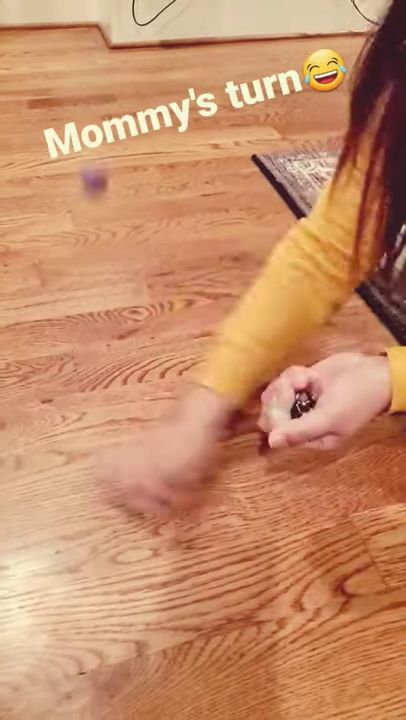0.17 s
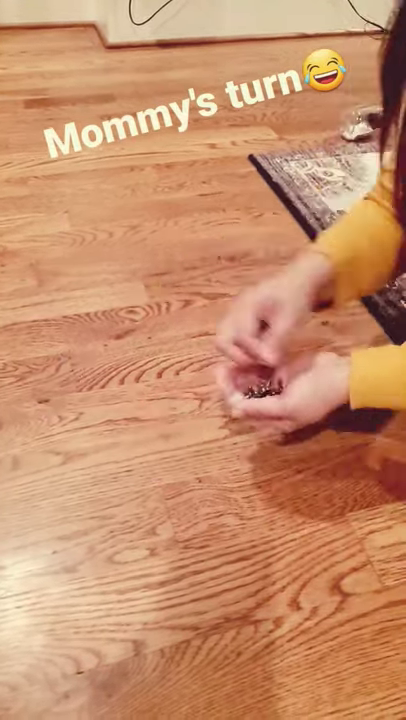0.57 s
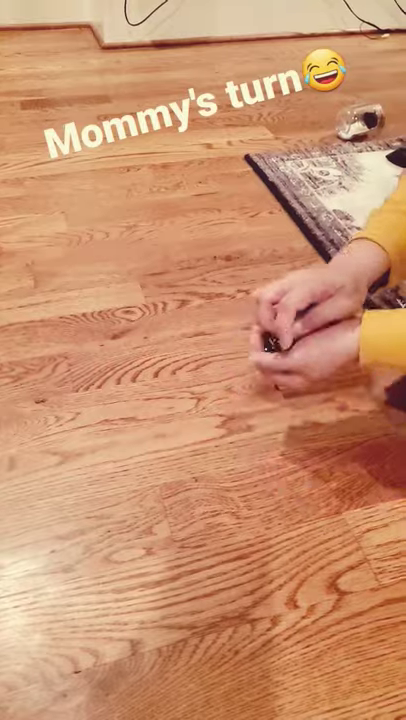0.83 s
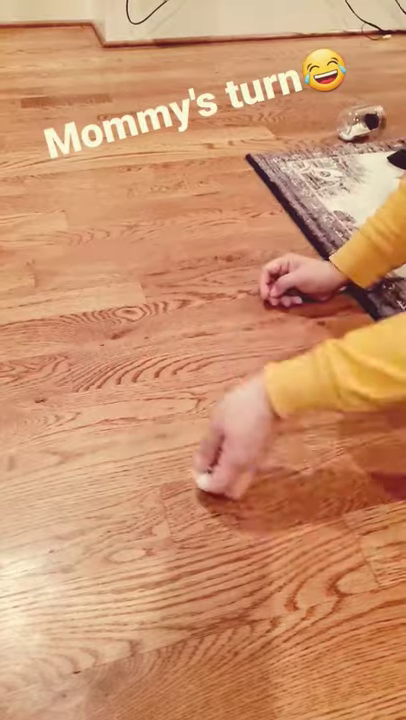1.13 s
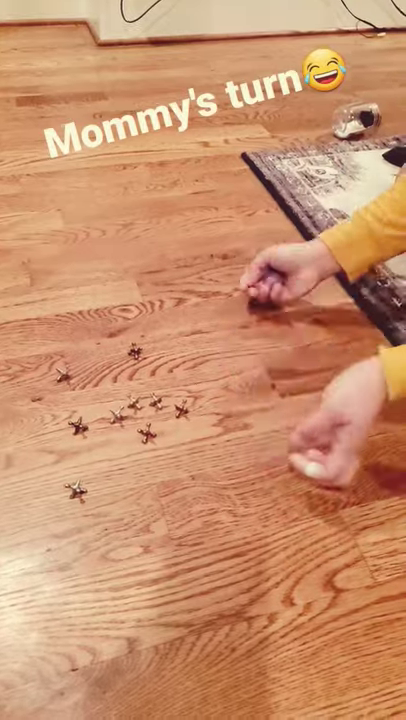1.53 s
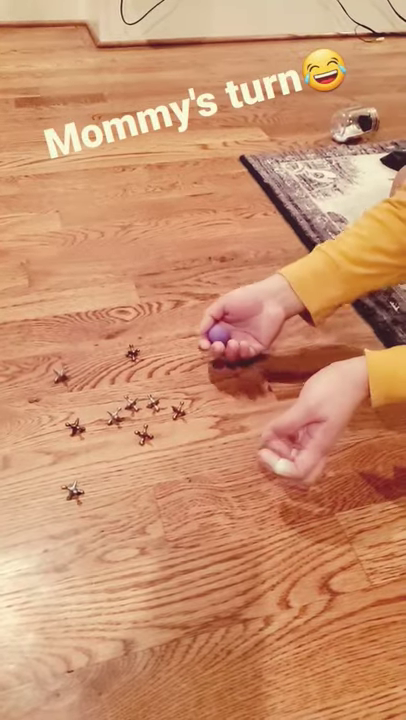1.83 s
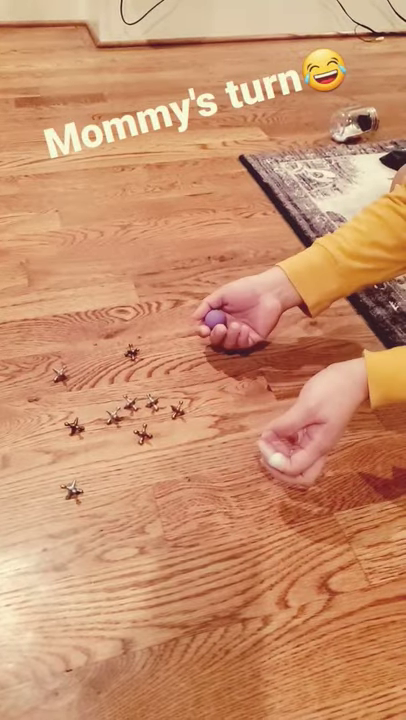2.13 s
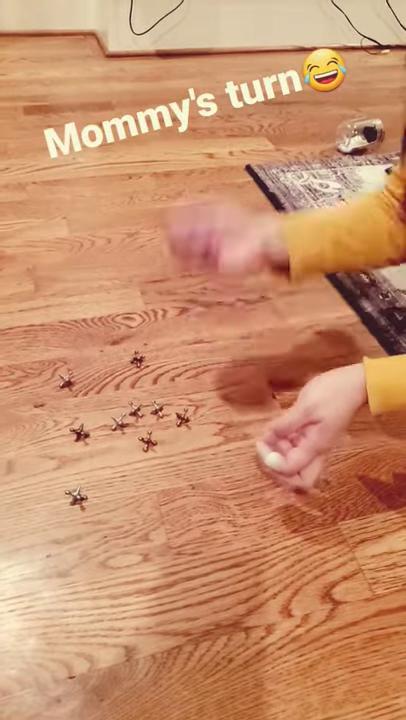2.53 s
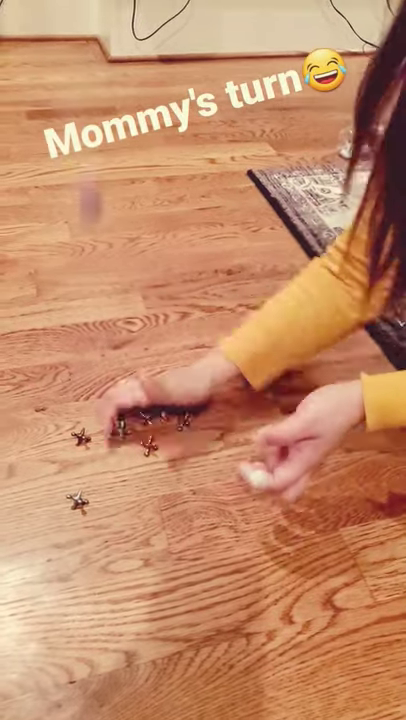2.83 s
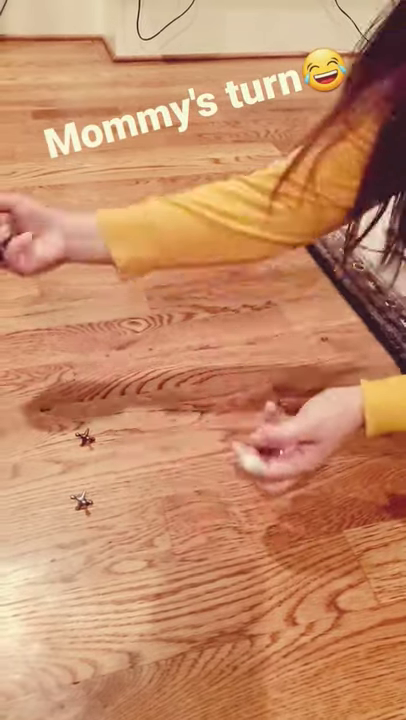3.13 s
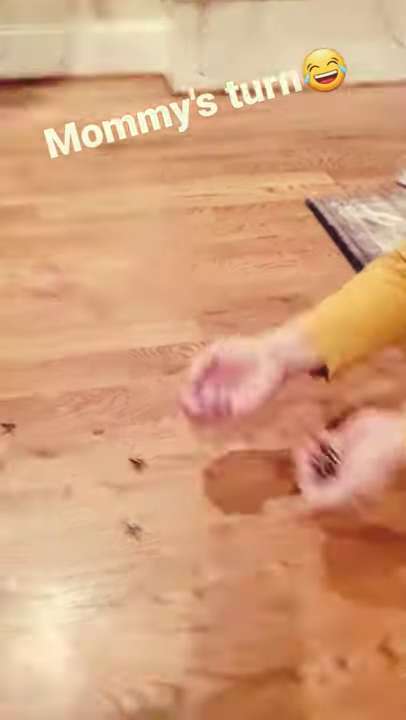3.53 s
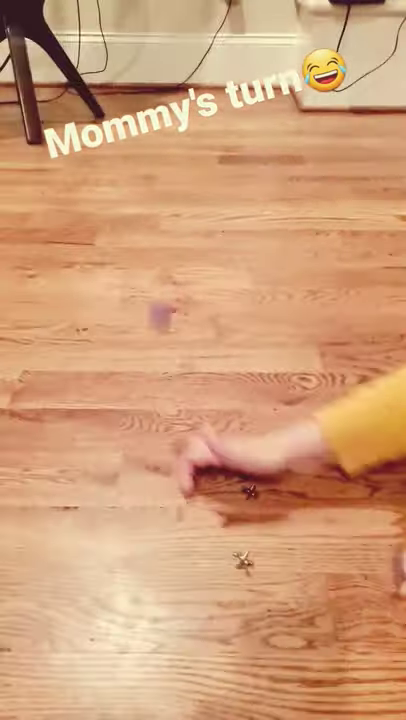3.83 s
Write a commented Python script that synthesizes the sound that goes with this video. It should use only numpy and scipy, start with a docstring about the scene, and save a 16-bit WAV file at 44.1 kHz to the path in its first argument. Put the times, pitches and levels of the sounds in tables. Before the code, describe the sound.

Metal jacks jingle and scatter over wooden boards between soft thumps of ball and hand.

```python
"""Over faint room noise a small metal jack clinks; then a handful is swept off a wooden floor, jingled
in the palm and scattered again, close to a phone. The jacks' arms ring very high as they collide, and
their tips knock and scrape the boards. Hands and sleeves brush softly, and a rubber ball and the hand
thump the floor, setting its low modes going and shaking the phone."""
import sys
import numpy as np
from scipy import signal
from scipy.fft import rfft, irfft
from scipy.io import wavfile
from scipy.ndimage import uniform_filter1d

SR = 44100
rng = np.random.default_rng(int(sys.argv[2]) if len(sys.argv) > 2 else 0)


def file_out(sig):
    """Save sig as 16-bit WAV at sys.argv[1]."""
    # one column per channel
    cols = np.atleast_2d(sig).T
    # limit, then scale
    lim = np.clip(cols, -1, 1)
    pcm = np.round(lim * 32767).astype(np.int16)
    wavfile.write(sys.argv[1], SR, pcm)


N = 176400
HZ = np.fft.rfftfreq(2048, 1 / SR)
JACKS_PAN_DB = -2.5  # left minus right


def amp(db):
    return 10 ** (np.asarray(db) / 20)


def unit_rms(x):
    return x / np.sqrt(np.mean(x ** 2) + 1e-20)


def curve(points, hz):
    f, value = np.transpose(points)
    return np.interp(np.log(hz + 1), np.log(f + 1), value)


def add(mix, s, sound, pan_db=-0.5, lag_samples_per_db=4.5):
    """Places a sound; the farther microphone hears it weaker and later."""
    for side, sign in enumerate((1, -1)):
        lag = max(-sign * pan_db * lag_samples_per_db, 0)
        part = mix[side, round(s * SR + lag):][:len(sound)]
        part += amp(sign * pan_db / 2) * sound[:len(part)]


def click(gain_db):
    """A minimum-phase click with the given EQ over HZ."""
    cepstrum = irfft(np.maximum(gain_db, -100) * np.log(10) / 20)
    cepstrum[1:1024] *= 2
    cepstrum[1025:] = 0
    return irfft(np.exp(rfft(cepstrum)))


def band_click(centre_hz, narrow_db):
    """A click that is narrow_db down one octave from its centre."""
    return click(-narrow_db * np.log2((HZ + 20) / centre_hz) ** 2)


def strikes(size, per_s, spread_db):
    """Sparse impacts of random size and sign."""
    chance, force, side = rng.random((size, 3)).T
    return (chance < per_s / SR) * amp(spread_db * np.minimum(-np.log(force + 1e-9), 4)) * np.sign(side - .5)


# Room tone EQ: (frequency [Hz], level [dB])
ROOM_TONE_EQ = [(15, -46), (25, -5.5), (209, -8), (297, -12), (433, -6), (495, -15.5), (741, -17.5),
                (1750, -22), (9050, -41), (12500, -32), (15500, -50.5)]


def room_tone(noise_db=-63, correlation=.1, hum_hz=437, hum_db=-71.5, hum_width_hz=4):
    """A wide bed of patchy noise with a thin wavering hum."""
    frames, hz = N // 256 + 5, np.fft.rfftfreq(1024, 1 / SR)
    a, b, c, d, patches = rng.standard_normal((frames, 513, 5)).T
    patches = unit_rms(uniform_filter1d(uniform_filter1d(patches, 12, 0), 14, 1))
    left = a + 1j * b
    right = correlation * left + np.sqrt(1 - correlation ** 2) * (c + 1j * d)
    spectra = np.array([left, right]) * amp(curve(ROOM_TONE_EQ, hz)[:, None] + 1.7 * patches)
    noise = unit_rms(signal.istft(spectra, nperseg=1024, noverlap=768)[1][:, :N])
    pole = np.exp(-np.pi * hum_width_hz / SR)
    waver = signal.lfilter([1], [1, -pole], rng.standard_normal(N) + 1j * rng.standard_normal(N))
    carrier = np.exp(2j * np.pi * hum_hz * np.arange(N) / SR)
    hum = unit_rms(((waver / waver.std() + 1) * carrier).real)
    return amp(noise_db) * noise + amp(hum_db) * hum


def arm_ring(t, hz, db, t60=.035, attack_s=.0049, split_hz=150):
    """One bending mode of a jack's arms: a close pair of tones that swells, then is damped ever faster."""
    twin_hz = hz + split_hz * rng.uniform(-1.2, 1)
    pair = np.sin(2 * np.pi * hz * t) + amp(-4) * np.sin(2 * np.pi * twin_hz * t)
    rattle = 1 + .22 * unit_rms(uniform_filter1d(rng.standard_normal(len(t)), size=150))  # loose neighbours
    attack = np.sin(np.pi / 2 * np.minimum(t / attack_s, 1)) ** 2
    return amp(db - 60 * (t / t60) ** 1.42) * attack * pair * rattle


UPPER_MODE_HZ = 14470
# Lower bending mode of each of the five jacks: (frequency [Hz])
LOWER_MODES_HZ = [12000, 12060, 12165, 12230, 12290]
# Bright EQ of the ticks: (frequency [Hz], level [dB])
TICK_EQ = [(800, -45.5), (2590, -12.5), (4500, -3.5), (7500, 0.5), (11000, -0.5), (14500, -2)]
# Jack-on-jack cues, before each layer's trim: (time [s], lower ring [dB], upper ring [dB], tick [dB])
CLINK_CUES = [(.0745, -38, -54, -57), (.3339, -31.5, -35, -55.5), (.3666, -24.5, -33.5, -61.5),
              (.396, -38, -34.5, -43.5), (.5366, -52.5, -59, -54.5), (.5536, -36, -39.5, -50.5),
              (.5948, -27, -37.5, -48), (.6034, -43, -39, -45), (.6494, -33.5, -46, -47),
              (.7686, -44, -51, -55.5), (.831, -45, -53, -65), (.8424, -48, -47, -57),
              (.8634, -22, -34, -38), (.876, -23.5, -36, -42), (.8854, -24, -33, -44),
              (.9064, -29.5, -41, -44), (.9713, -19.5, -27, -39), (.9884, -40, -38, -58),
              (1.0375, -31, -39, -54), (1.084, -58, -60, -65), (1.1164, -35, -52, -49.5),
              (1.138, -50, -58, -57), (1.1717, -54, -56, -54.5), (1.2087, -43, -61, -64),
              (1.2304, -42.5, -55, -51.5), (1.3604, -42, -55, -55.5), (1.3877, -35, -40, -47),
              (1.453, -21.5, -34.5, -40.5), (1.4795, -17.5, -36, -44), (1.491, -20.5, -34, -39.5),
              (2.9519, -27, -44, -40), (2.975, -23.5, -55, -50), (3.003, -22, -49.5, -38),
              (3.0413, -20, -42, -43), (3.0523, -29, -23.5, -49), (3.0856, -23, -38, -45.5),
              (3.1154, -25, -30, -32.5), (3.2716, -33.5, -52, -49), (3.2812, -25.5, -43, -47.5),
              (3.3407, -29.5, -33, -37), (3.4413, -67, -64, -58.5), (3.4785, -51, -55.5, -58.5),
              (3.5263, -29, -34.5, -46), (3.547, -32, -31, -41), (3.5575, -16.5, -17, -36.5),
              (3.5902, -23, -34.5, -48), (3.62, -32, -46, -52), (3.646, -34, -46, -48),
              (3.6663, -35.5, -44, -50.5), (3.7076, -34, -54, -58)]


def clinks(mix, chatter_t60=.11, tick_t60=.019, tick_attack_s=.0017):
    """A strike and its dying chatter ring two bending modes over short bright ticks."""
    t = np.arange(6000) / SR
    colour = click(curve(TICK_EQ, HZ))
    colour /= np.linalg.norm(colour)
    tick_shape = amp(-60 * t / tick_t60) * np.minimum(t / tick_attack_s, 1)
    for s, lower_db, upper_db, tick_db in CLINK_CUES:
        hits = strikes(len(t), per_s=350, spread_db=2.9) * amp(-15 - 60 * t / chatter_t60)
        hits[0] = 1
        bursts = signal.fftconvolve(abs(hits), tick_shape) * rng.standard_normal(2 * len(t) - 1)
        ticks = amp(tick_db + 7) * signal.fftconvolve(bursts, colour)[:len(bursts)]
        lower = arm_ring(t, rng.choice(LOWER_MODES_HZ), lower_db)
        upper = arm_ring(t, UPPER_MODE_HZ + 60 * rng.standard_normal(), upper_db + 6.5)
        rings = signal.fftconvolve(hits, lower + upper)
        add(mix, s, rings + ticks, JACKS_PAN_DB + 3 * rng.standard_normal())


# Start of each brush: (time [s])
BRUSH_CUES = [.225, .275, .62, .955, 1.215, 2.265, 2.362, 2.72, 3.315, 3.53]
# Shape of each brush: (length [s], level [dB], centre [Hz], narrowness [dB/octave^2])
BRUSH_SHAPES = [(0.19, -64, 1630, 21.5), (0.048, -60, 8700, 0), (0.054, -60, 1000, 7),
                (0.039, -54, 2900, 8.5), (0.043, -58.5, 4700, 4.5), (0.053, -59.5, 1700, 16),
                (0.078, -50, 6000, 1), (0.095, -57, 5200, 0), (0.059, -42, 3400, 1),
                (0.1, -43.5, 3900, 1.5)]


def brushes(mix):
    """Hands and sleeves brush in soft puffs of noise with a quick attack and a fading tail."""
    for s, (length, db, hz, narrow_db) in zip(BRUSH_CUES, BRUSH_SHAPES):
        progress = np.linspace(0, 1, round(length * SR))
        noise = rng.standard_normal(len(progress))
        puff = unit_rms(signal.fftconvolve(noise, band_click(hz, narrow_db))[:len(noise)])
        add(mix, s, amp(db - 12 * progress) * np.minimum(progress / .14, 1) * puff)


# Low modes of the floor: (frequency [Hz], level [dB], t60 [s])
FLOOR_MODES = [(159.2, -10, .055), (261, -0.5, .045), (343.5, -7.5, .05), (498, -5, .03)]
# Ball and hand landing on the floor: (time [s], peak level [dB])
THUMP_CUES = [(0.277, -43.5), (0.295, -47), (0.344, -41), (0.395, -30), (0.442, -18.5), (1.414, -35),
              (2.85, -43.5), (3.081, -13.5), (3.978, -46)]


def thumps(push_s=.0087, shake_hz=32, shake_t60=.2):
    """A soft push makes the floor boom and shakes the phone, its two microphones in opposition."""
    t = np.arange(8000) / SR
    push = 1 - np.exp(-t / push_s)
    boom = push * sum(amp(db - 60 * (t / t60) ** 1.5) * np.sin(2 * np.pi * hz * t)
                      for hz, db, t60 in FLOOR_MODES)
    wobble = push * amp(-15.5 - 60 * t / shake_t60) * np.sin(2 * np.pi * shake_hz * t)
    floor, shake = np.zeros((2, 2, N))
    for s, db in THUMP_CUES:
        add(floor, s, amp(db) * boom / abs(boom).max(), pan_db=-3)
        add(shake, s, amp(db) * wobble, pan_db=0)
    return floor, shake * [[1], [-.6]]


def skid(sound, decay_s=.0007):
    """A rounded tip lands and skids for a moment, so the blow is a short cluster."""
    t = np.arange(300) / SR
    cluster = amp(-15) * np.exp(-t / decay_s) * rng.standard_normal(len(t))
    cluster[0] = 1
    blow = signal.fftconvolve(sound, cluster)
    return blow / np.linalg.norm(blow)


# Broad body of the wood: (frequency [Hz], level [dB])
WOOD_EQ = [(59, -55), (100, -35), (257, -3), (512, -15), (623, -2.5), (837, -7), (1910, 1), (2950, -7.5),
           (3730, -4), (5110, -10), (7280, -12), (9780, -44.5), (11000, -29.5), (14300, -57)]
# Plank resonances: (frequency [Hz], width [Hz], level [dB])
PLANK_MODES = [(1000, 150, -6), (1400, 100, -5), (1860, 130, 8), (2080, 160, 5), (3570, 100, -7),
               (3940, 110, -5), (5660, 340, -10)]


def plank_tap(pitch, dull_hz, ring_db):
    """A tip strikes the planks; each spot shifts their resonances a little."""
    body = amp(curve(WOOD_EQ, HZ))
    for hz, width, db in PLANK_MODES:
        spot_hz = hz * pitch * (1 + .05 * rng.standard_normal())
        body += amp(db + ring_db) / np.hypot(1, 2 * (HZ - spot_hz) / width)
    return skid(click(20 * np.log10(body) - 6 * (HZ / dull_hz) ** 2))


# Hard accents on the boards: (time [s], relative level [dB])
KNOCK_CUES = [(0.296, -41.5), (0.33, -11.5), (0.334, -16.5), (0.346, -9), (0.39, -7), (0.397, -11),
              (0.424, -11), (1.417, -6), (1.422, -8.5), (1.433, -8), (1.452, -17), (1.461, -13.5),
              (2.909, -12.5), (2.92, -14.5), (2.945, -18), (3.034, -17)]


def knocks(mix, start, end, pitch):
    """Single tips hit the boards hard during one sweep or just ahead of it."""
    for s, db in KNOCK_CUES:
        if start - .05 < s < end:
            knock = plank_tap(pitch, dull_hz=4600, ring_db=8)
            add(mix, s, amp(db + 9) * knock, JACKS_PAN_DB + rng.standard_normal())


def metal_click():
    """A bright click of metal on metal."""
    return skid(band_click(7000 * rng.uniform(.9, .96), narrow_db=30))


# Fader moves, one list a sweep: (time [s], level [dB])
SWEEP_FADERS = [
    [(.328, -37), (.335, -37.5), (.36, -31), (.385, -29.5), (.395, -21), (.415, -32), (.43, -29.5),
     (.45, -41)],
    [(1.39, -58), (1.416, -41.5), (1.42, -26.5), (1.445, -29), (1.46, -22), (1.5, -27.5), (1.515, -28.5),
     (1.56, -28.5), (1.62, -33.5), (1.7, -41), (1.8, -54.5), (1.82, -81)],
    [(2.9, -52), (2.93, -47), (2.95, -39), (2.975, -45), (3.03, -33), (3.07, -24.5), (3.095, -26.5),
     (3.113, -24.5), (3.135, -49)],
    [(3.95, -66), (3.978, -47.5), (4.0, -48.5)],
]
# Feel of each sweep: (smooth drag share [0-1], jingle [dB], plank pitch [ratio], sizzle [dB])
SWEEP_FEELS = [(.5, -24, .96, -22), (.35, -19, 1.05, -40), (.4, -21, .97, -23), (0.77, -23, 0.975, -30)]


def sweeps(mix, sizzle_hz=12700):
    """Five jacks drag and tap over the planks, their arms sizzling as they rub and jingling as they hit."""
    ring_t = np.arange(4000) / SR
    for fader, (drag, jingle_db, pitch, sizzle_db) in zip(SWEEP_FADERS, SWEEP_FEELS):
        times, db = np.transpose(fader)
        t = np.arange(times[0], times[-1], 1 / SR)
        level = amp(np.interp(t, times, db))
        for lower_hz, pan_db in zip(LOWER_MODES_HZ, (-6.5, -5.5, -2.5, -1, 2)):
            taps = unit_rms(strikes(len(t), per_s=300, spread_db=3.5))
            drive = level * (np.sqrt(1 - drag) * taps + np.sqrt(drag) * rng.standard_normal(len(t)))
            wood = amp(-5.5) * plank_tap(pitch, dull_hz=15000, ring_db=-.7)
            sizzle = amp(sizzle_db) * skid(band_click(sizzle_hz, narrow_db=160))
            rings = arm_ring(ring_t, lower_hz, jingle_db) + arm_ring(ring_t, UPPER_MODE_HZ, jingle_db - 5.5)
            hits = level * strikes(len(t), per_s=80, spread_db=3)
            tick = amp(jingle_db + 17) * metal_click()
            for force, response in ((drive, wood), (drive, sizzle), (hits, rings), (hits, tick)):
                add(mix, times[0], signal.fftconvolve(force, response), pan_db)
        knocks(mix, times[0], times[-1], pitch)


# Tones of a knock in the palm: (frequency [Hz], level [dB], t60 [s])
PALM_MODES = [(1800, -2.5, 0.05), (2540, -4, .03), (3460, -2, 0.053)]
# Landings in the hand: (time [s], level [dB])
PALM_CUES = [(0.863, -46), (.968, -41), (3.332, -47), (3.541, -46.5)]


def palm_knocks(mix):
    """Jacks land in the cupped hand with a small, quickly damped knock."""
    t = np.arange(6000) / SR
    knock = sum(amp(db - 60 * t / t60) * np.sin(2 * np.pi * hz * t) for hz, db, t60 in PALM_MODES)
    for s, db in PALM_CUES:
        add(mix, s, amp(db) * knock, JACKS_PAN_DB)


# Sharp metal accents among the sweeps: (time [s], relative level [dB])
TIP_CUES = [(1.46, -22.5), (1.491, -31), (1.523, -25), (1.53, -23), (1.567, -30), (1.632, -33),
            (1.686, -39), (1.72, -45), (2.937, -38), (2.952, -25.5), (2.996, -27), (3.006, -25)]


def tip_clicks(mix):
    """Two tips meet with a single sharp click."""
    for s, db in TIP_CUES:
        add(mix, s, amp(db + 12) * metal_click(), JACKS_PAN_DB + rng.standard_normal())


# Reverb decay: (frequency [Hz], t60 [s])
ROOM_DECAY = [(150, 0.16), (400, 0.25), (1500, 0.29), (4000, 0.21), (9000, 0.22), (14000, 0.12)]


def reverb(x):
    """Sparse reflections of random sign, separate for each side, each band dying at its own speed."""
    taps = np.zeros((2, SR // 2))
    at = np.arange(120, SR // 2 - 20, 20) + rng.integers(0, 20, (2, (SR // 2 - 121) // 20))
    np.put_along_axis(taps, at, rng.choice([-1., 1.], at.shape), 1)
    hz, t, bands = signal.stft(taps, SR, nperseg=256)
    tail = signal.istft(bands * amp(-60 * t / curve(ROOM_DECAY, hz)[:, None]), SR, nperseg=256)[1]
    return signal.fftconvolve(x, tail / np.linalg.norm(tail[0]), axes=1)[:, :N]


def scene():
    """Jacks, hands and floor over the room tone; the thumps get a lighter reverb send."""
    mix = np.zeros((2, N))
    for source in (clinks, brushes, sweeps, palm_knocks, tip_clicks):
        source(mix)
    floor, shake = thumps()
    wet = amp(-7) * reverb(mix + amp(-6) * floor)
    return room_tone() + mix + floor + shake + wet


def record(dry, shelf_hz=15200, shelf_db=-25, cutoff_hz=16160):
    """The microphone shelves down steeply in the top treble, then a low-pass cuts the rest."""
    shelf = signal.firwin(255, shelf_hz, window=("kaiser", 6), fs=SR)[None]
    lowpass = signal.firwin(511, cutoff_hz, window=("kaiser", 9), fs=SR)[None]
    below = signal.oaconvolve(dry, shelf, "same")
    return signal.oaconvolve(below + amp(shelf_db) * (dry - below), lowpass, "same")


dry = scene()
out = record(dry)
file_out(out)
```